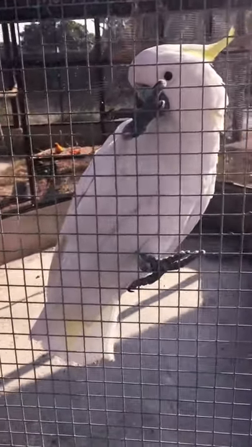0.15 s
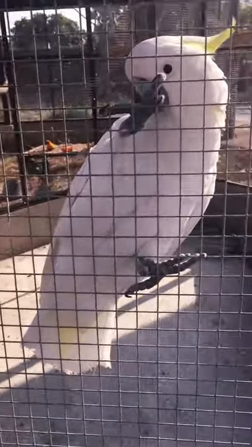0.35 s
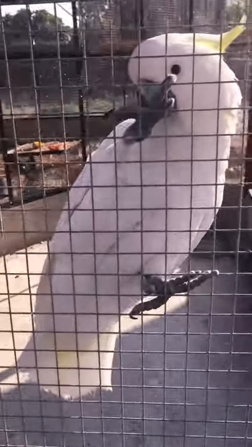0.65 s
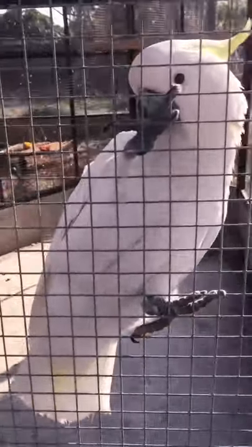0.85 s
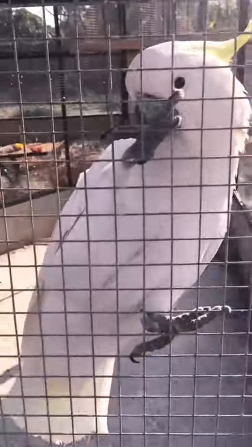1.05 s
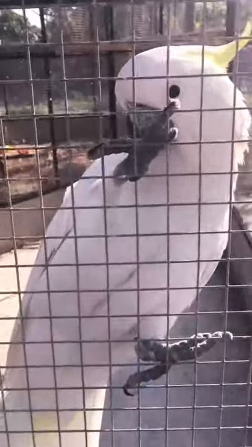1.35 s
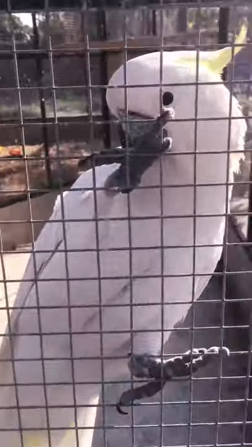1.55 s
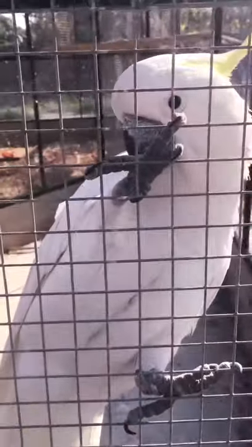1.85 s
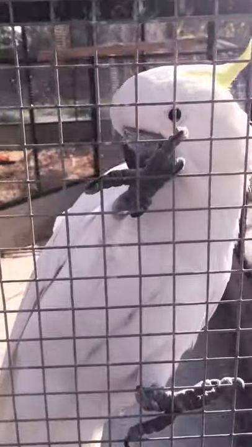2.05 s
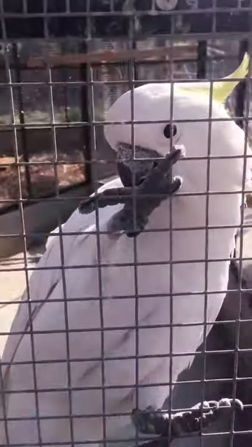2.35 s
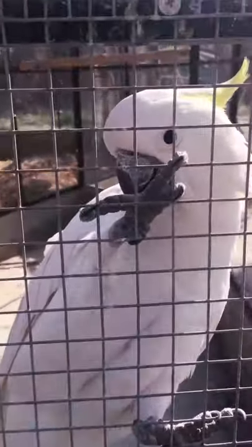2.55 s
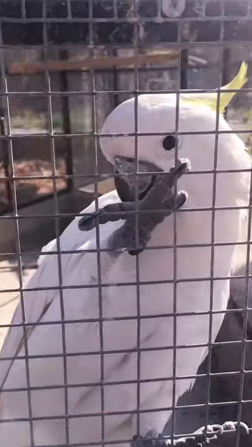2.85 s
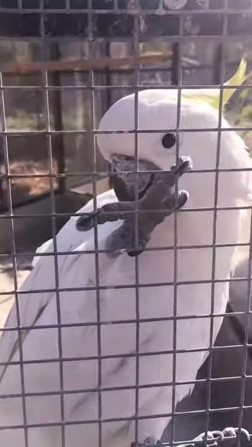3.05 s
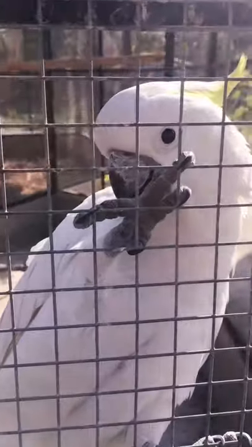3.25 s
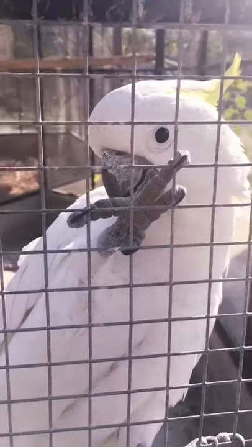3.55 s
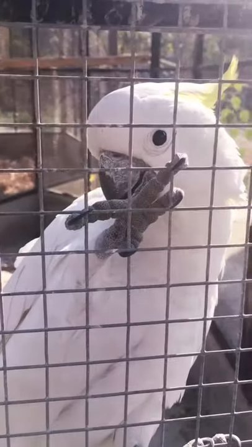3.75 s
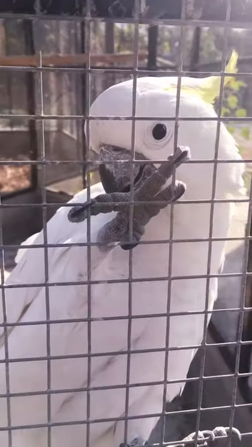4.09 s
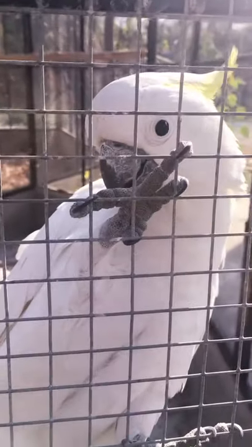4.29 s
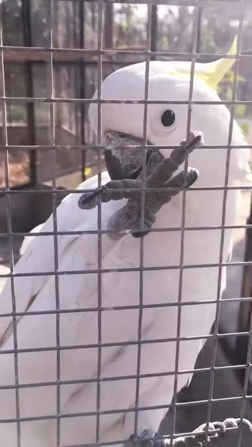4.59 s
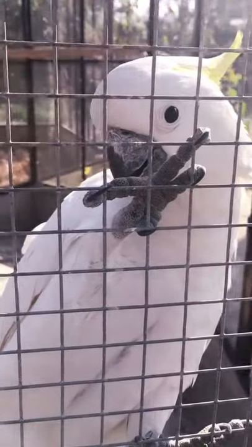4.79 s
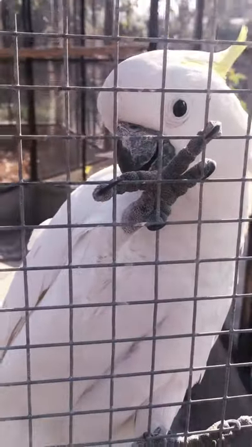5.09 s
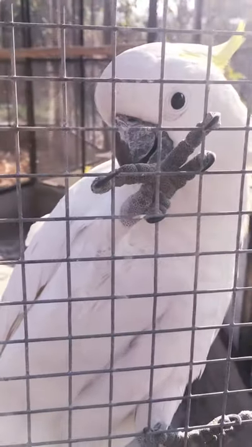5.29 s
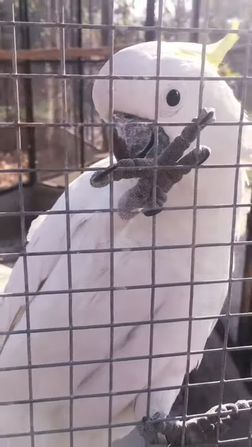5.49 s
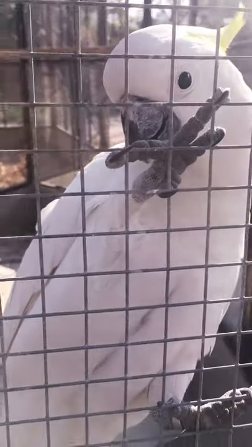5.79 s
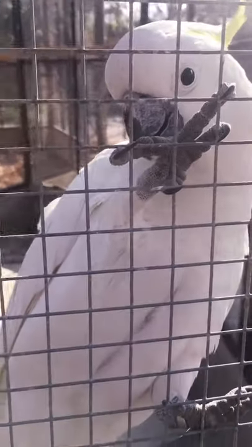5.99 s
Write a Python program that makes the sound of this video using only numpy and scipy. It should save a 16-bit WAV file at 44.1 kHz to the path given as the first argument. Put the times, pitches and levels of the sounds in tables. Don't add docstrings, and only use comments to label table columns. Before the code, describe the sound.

Bursts of loud raspy parrot squawks and falling whistles over faint engine hum, soft dove hoots and claw ticks, ending in a short croak.

```python
import sys
import numpy as np
from scipy import signal
from scipy.fft import rfft, irfft, next_fast_len
from scipy.io import wavfile
from scipy.ndimage import uniform_filter1d, map_coordinates

SR = 44100
rng = np.random.default_rng(int(sys.argv[2]) if len(sys.argv) > 2 else 0)


def linear_from_db(decibels):
    return 10 ** (np.asarray(decibels, float) / 20)


def to_wav(s):
    ch = np.atleast_2d(s).T
    pcm = np.round(np.clip(ch, -1, 1) * 32767)
    wavfile.write(sys.argv[1], SR, pcm.astype(np.int16))


N = 270333
T = np.arange(N) / SR


def unit(x):
    return x / np.sqrt(np.mean(x ** 2) + 1e-20)


def along(points, hz):
    f, v = np.transpose(points)
    return np.interp(np.log(hz + 1), np.log(f + 1), v)


def wobble(rate, size):
    knots = rng.standard_normal(int(size * rate / SR) + 4)
    return map_coordinates(knots, [np.arange(size) * rate / SR])


def filtered(x, response):
    m = next_fast_len(len(x) + 8192)
    return irfft(rfft(x, m) * response(np.fft.rfftfreq(m, 1 / SR)), m)[:len(x)]


# f/Hz, level/dB per Hz
AIR_COLOUR = [(59, -7.5), (100, -10), (129, -9.5), (500, -20), (944, -17), (3660, -24), (3990, -20.5),
              (4620, -27.5), (5840, -25), (7690, -37), (11500, -39), (15800, -41)]
# t/s, level/dB
AIR_LEVEL = [(0, -55.5), (.6, -57.5), (1.3, -58), (2.8, -56.5), (3.05, -52), (3.3, -55), (4.9, -55),
             (6.13, -55)]


def air():
    z = signal.stft(rng.standard_normal(N), nperseg=512)[2]
    patches = uniform_filter1d(rng.standard_normal(z.shape), 6, 0)
    patches = uniform_filter1d(patches, 14, 1)
    patchy = signal.istft(z * linear_from_db(1.8 * unit(patches)), nperseg=512)[1][:N]
    coloured = unit(filtered(patchy, lambda hz: linear_from_db(along(AIR_COLOUR, hz))))
    return linear_from_db(np.interp(T, *np.transpose(AIR_LEVEL))) * coloured


# t/s, throb level/dB, drone level/dB, whine level/dB
ENGINE_LEVELS = [
    (0.0, -61, -61, -61),
    (0.56, -60, -63, -61.5),
    (2.99, -61, -64.5, -70),
    (3.34, -61, -60, -92),
    (3.91, -59.5, -62, -85),
    (5.53, -61, -52.5, -104),
    (6.13, -58, -48.5, -67),
]


def engine():
    s, *levels = np.transpose(ENGINE_LEVELS)
    out = np.zeros(N)
    for hz, db, drift in zip((55, 73.5, 166), levels, (.07, .012, .008)):
        turn = 2 * np.pi * np.cumsum(hz * (1 + drift * wobble(12, size=N))) / SR
        out += linear_from_db(np.interp(T, s, db) + 2.2 * wobble(6.9, size=N)) * np.sqrt(2) * np.sin(turn)
    weak = sum(linear_from_db(3 * wobble(5, size=N)) * np.sin(turn * order / 3) for order in range(4, 7))
    return out + linear_from_db(np.interp(T, s, db) - 7.0) * weak


# t/s, length/s, f/Hz, level/dB
COOS = [
    (0, 0.24, 219.5, -58),
    (0.699, 0.16, 256, -55.5),
    (2.631, 0.16, 257, -58.5),
    (5.68, 0.27, 221, -60.5),
]


def coos():
    out = np.zeros(N)
    for s, length, hz, db in COOS:
        swell = np.sin(np.pi * np.clip((T - s) / length, 0, 1)) ** 0.17
        out += linear_from_db(db) * swell * np.sqrt(2) * np.sin(2 * np.pi * hz * T)
    return out


def notes(rows, shape):
    peak, rise_db, fall_db, bend = shape
    u = np.linspace(0, 1, 9)
    swell_db = np.interp(u, (0, np.clip(peak, .05, .95), 1), (-rise_db, 0, -fall_db))
    curves = []
    for s, length, db, first, last in rows:
        pitch_hz = last + (first - last) * (1 - u) ** bend
        curves.append(np.transpose([s + length * u, pitch_hz, db + swell_db]))
    return curves


def partials(turn, pitch_hz, share, gains, k):
    clock = np.cumsum(150 + 900 * share ** 2) / SR
    high = .5 + k * pitch_hz.mean() / 5000
    knots = rng.standard_normal((len(k), 2, int(4 * clock[-1]) + 2))
    slip = []
    for h, (re, im) in zip(high, knots):
        slip.append(np.interp(clock * h, np.arange(len(re)), re + 1j * im))
    firm = (1 - share) ** high
    step = np.sqrt(firm) + np.sqrt(.75 * (1 - firm)) * np.array(slip)
    stack = gains * step * np.exp(1j * (k * turn + .1 * k * k))
    return stack.real.sum(0) / np.sqrt((gains ** 2).sum(0) / 2)


def bird(calls, manner, rough, throats, flutter_db, breath_db, edge=0.011):
    out = np.zeros(N)
    for rows, (*odd, bright_db), (onset, settled, settle_s), throat in zip(
            calls, manner, rough, throats * len(calls)):
        s, *cols = np.transpose(rows)
        a, b = max(int(s[0] * SR), 0), min(int(s[-1] * SR), N)
        t = T[a:b]
        pitch_hz, level_db = [np.interp(t, s, c) for c in cols]
        odd_db = np.interp(t, s[[0, -1]], (odd[0], odd[-1]))

        tilt_db = bright_db + 0.2241 * (level_db - level_db.max())
        tilt_db = tilt_db - 2 * np.exp((s[0] - t) / 0.022)
        share = settled + (onset - settled) * np.exp((s[0] - t) / settle_s)

        def colour(hz, tilt):
            return linear_from_db(along(throat, hz) + tilt * np.log2(hz / 3000 + .01))

        tremble = 1 + .03 * share ** 2 * wobble(200, size=b - a) + .02 * share * wobble(35, size=b - a)
        turn = 2 * np.pi * np.cumsum(pitch_hz * tremble) / SR
        k = np.arange(1, 16000 // pitch_hz.min() + 1)[:, None]
        gains = colour(k * pitch_hz, tilt_db) * linear_from_db(np.minimum(odd_db, 6) * (k % 2))
        gains = gains * (k * pitch_hz < 16000)
        tone = partials(turn, pitch_hz, share, gains, k)

        puffs = rng.standard_normal(b - a) * (1 + np.cos(turn)) ** 2
        breath = unit(filtered(puffs, lambda hz: colour(hz, tilt_db.mean())))
        rasp = unit(filtered(puffs, lambda hz: colour(hz, tilt_db.mean() - 5)))
        air_noise = linear_from_db(breath_db) * (.075 * breath + share ** 3 * rasp)

        flutter = linear_from_db(flutter_db * (1 - .7 * share ** 2) * wobble(140, size=b - a))
        fade = np.clip(np.minimum(t - s[0], s[-1] - t) / edge, 0, 1)
        out[a:b] += linear_from_db(level_db) * fade * unit(flutter) * (tone + air_noise)
    return out



# t/s, length/s, peak level/dB, first f/Hz, last f/Hz
FAR = [
    (0, 0.17, -70.5, 668, 652),
    (.49, 0.098, -70.5, 938, 883),
    (.83, 0.051, -68, 880, 877),
    (3.49, 0.35, -67, 873, 904),
    (4.39, 0.16, -73, 3780, 3840),
    (4.83, 0.067, -66.5, 1080, 1000),
    (5.62, 0.087, -74.5, 1017, 947),
    (5.97, 0.15, -60.5, 1050, 1112),
    (3, 0.21, -69.5, 1424, 1423),
    (3.015, 0.064, -66, 2010, 1860),
]
LATE_SWELLS = [
    (.65, .165, -68, 776, 648),
    (5.695, 0.078, -68, 770, 950),
]
FAR_SHAPE = (0.11, 1, 7.9, 0.906)
LATE_SHAPE = (0.27, 30, 8.3, 1.3)
FAR_MANNER = [(8, -3.5), (-6, -17), (-2, -8), (-20, -23.5), (-3, -21), (-9, -5), (15, -4), (-7.5, -4.5),
              (6, -5.5), (6, -7)]
LATE_MANNER = [(1, -0.5), (-1.7, -14)]
FAR_ROUGH = [(r, r, 1) for r in (.45, .4, .4, .68, .35, .7, .45, .3, .45, .4, .25, .4)]
DISTANT_THROAT = [(400, 11), (700, -9.5), (4200, 2), (5600, -20), (8000, -23)]


def far_whistlers():
    calls = notes(FAR, FAR_SHAPE) + notes(LATE_SWELLS, LATE_SHAPE)
    return bird(calls, FAR_MANNER + LATE_MANNER, FAR_ROUGH, [DISTANT_THROAT],
                flutter_db=2, breath_db=-6, edge=.02)


# t/s, peak level/dB, wire f/Hz
CLAWS = [(.0276, -25, 6280), (0.0364, -32, 6500), (0.807, -55, 12000), (0.8106, -37.5, 6400),
         (1.041, -46, 13000), (2.7573, -42, 4020), (2.989, -54, 13500), (3.029, -46, 14200),
         (3.153, -78, 13000), (3.634, -45, 9000), (3.7349, -22.5, 3380), (3.739, -33, 3160),
         (3.7435, -54, 3140), (3.7549, -39, 6200), (3.767, -39, 13100), (3.779, -49, 6000),
         (3.817, -34, 11200), (3.8198, -35.5, 6700), (3.8267, -39, 5660), (3.842, -57, 4000),
         (3.876, -51, 3180), (4.4468, -53, 14000), (4.478, -68, 13000), (4.5013, -44.5, 9100),
         (4.507, -48, 7000), (4.522, -44, 6500), (4.553, -47, 12000), (4.566, -43, 11400),
         (4.570, -37, 12500), (4.577, -39, 7300), (4.592, -54, 5920), (4.618, -45, 11900),
         (4.623, -43, 9450), (4.635, -45, 6560), (4.654, -47, 8900), (4.659, -42, 8000),
         (4.668, -40.5, 9900), (4.673, -40, 7900), (4.696, -37, 7800), (4.701, -37, 7900),
         (4.733, -40, 13100), (4.753, -42, 12000), (4.757, -38, 9000), (4.782, -45, 13000),
         (4.785, -41, 9050), (5.757, -41, 4800), (5.968, -31, 3220), (5.974, -31, 2600)]
# t/s, peak level/dB
KNOCKS = [
    (0.0273, -26),
    (0.036, -24.5),
    (3.737, -46),
    (3.818, -36),
    (4.522, -36),
    (4.572, -37),
    (5.967, -40),
]


def claws():
    bright, dull = np.zeros(N + SR), np.zeros(N + SR)
    t = np.arange(SR // 20) / SR
    for s, db, hz in CLAWS:
        crack = rng.standard_normal(len(t)) * (linear_from_db(-60 * t / .0045) + linear_from_db(-17 - 60 * t / .06))
        ring = linear_from_db(2 - 60 * t / .006) * np.sin(2 * np.pi * hz * t)
        bright[round(s * SR):][:len(t)] += linear_from_db(db) * (crack + ring)
    for s, db in KNOCKS:
        dull[round(s * SR):][:len(t)] += linear_from_db(db - 60 * t / 0.023) * rng.standard_normal(len(t))
    wire = filtered(bright[:N], lambda f: (1j * f / (2600 + 1j * f)) ** 2 / (1 + 1j * f / 14000))
    frame = filtered(dull[:N], lambda f: 1j * f / (250 + 1j * f) / (1 + 1j * f / 2200) ** 2)
    return wire + frame


# t/s, f/Hz, level/dB
SHRILL = [
    [(.268, 1184, -47), (.3, 1124, -40.5), (.39, 1130, -41)],
    [(.378, 1206, -30.5), (.44, 1195, -42), (.48, 1240, -67)],
    [(3.42, 1190, -46), (3.47, 1271, -33.5), (3.51, 1382, -33.5), (3.57, 1338, -41)],
    [(4.72, 785, -47), (4.75, 862, -47), (4.79, 1054, -55.5), (4.91, 1042, -53)],
    [(5.025, 1265, -34.5), (5.07, 1249, -38.5), (5.11, 1273, -35.5), (5.16, 1300, -34), (5.19, 1305, -46),
     (5.22, 1310, -59)],
    [(.275, 1570, -48), (.33, 1570, -50), (.39, 1620, -53)],
    [(.265, 1180, -47), (.302, 1316, -41)],
]
SHRILL_MANNER = [(-30, -1.5), (-6, 3.5), (-5, 1.5), (-18, -5.5), (-2.5, 1.7), (-22, -4), (-25, -9)]
SHRILL_ROUGH = [(.65, .5, .05), (.75, .58, .05), (.7, .85, .08), (.8, .75, .1), (.82, .72, .1),
                (.6, .6, .1), (.45, .45, .1)]
PIPING_THROAT = [(1200, -47), (2300, -20), (3400, -2), (4500, 4), (6700, -12), (9000, -2.5), (10500, -28),
                 (16000, -34)]
SMALL_THROAT = [(1200, -45), (2000, -49), (2500, 9.5), (3600, 5), (4800, 0.5), (7000, -5), (9200, -5),
                (10500, -12), (16000, -34)]
THIN_THROAT = [(1200, -41), (2150, -33), (2500, 2.5), (3800, 0.5), (5300, 6.5), (6500, -12), (8200, -11.5),
               (9500, -5.5), (12000, -22), (16000, -31)]


def parakeets():
    throats = [PIPING_THROAT, SMALL_THROAT, THIN_THROAT, SMALL_THROAT, THIN_THROAT, SMALL_THROAT, SMALL_THROAT]
    return bird(SHRILL, SHRILL_MANNER, SHRILL_ROUGH, throats, flutter_db=3.5, breath_db=-1.5, edge=.02)


# t/s, f/Hz, level/dB
SCREECH = [
    [(.91, 1050, -48), (.935, 1042, -42), (.96, 1061, -42), (1.02, 1016, -41.5), (1.045, 936, -34)],
    [(1.005, 871, -44), (1.05, 874, -41), (1.07, 925, -37), (1.095, 928, -39), (1.12, 952.4, -34.5),
     (1.15, 933, -42)],
    [(1.38, 816, -43), (1.41, 873, -28), (1.45, 920, -26), (1.49, 1003, -25), (1.53, 956, -24),
     (1.58, 1023, -27.5), (1.615, 1011, -31.5), (1.645, 949, -29), (1.672, 910, -29)],
    [(1.9, 813, -38), (1.924, 850, -26), (1.945, 905, -16), (1.98, 933, -19), (2.02, 945.4, -16.5),
     (2.07, 941.7, -20.5), (2.11, 938, -19), (2.15, 855, -26)],
    [(2.355, 1004, -31), (2.39, 1043, -24.5), (2.42, 1095, -19.5), (2.46, 1058, -15), (2.52, 1020, -17.5),
     (2.58, 1013, -19), (2.63, 979, -24.5), (2.67, 944, -34)],
    [(5.785, 905.6, -42.5), (5.82, 997, -26), (5.87, 1029, -26.5), (5.91, 1031, -24.5),
     (5.932, 1016, -20.5), (5.948, 992, -21), (5.964, 926, -20.5), (5.985, 910, -45)],
]
SCREECH_MANNER = [(11, -4, -2), (-23, -25, -9), (3.5, -20, -1.5), (-8.5, 6, -2.5), (-1.5, -1, 0),
                  (19, -37, -1.5)]
SCREECH_ROUGH = [(.85, .82, .1), (.85, .55, .05), (.92, .3, .1), (.97, .27, .02), (.88, .38, .05),
                 (.99, .52, .09)]
RASP_THROAT = [(600, -61), (1050, -12.5), (2000, 0), (3000, -0.5), (4200, 0.5), (6500, -2.5), (9300, -3),
               (10500, -20), (16000, -24)]
BIG_THROAT = [(500, -106), (950, -40), (1350, -22), (1900, -7), (2700, -8), (3700, 0), (4300, 10),
              (5000, 5), (6100, -1), (7600, -8), (10500, -22), (16000, -31)]
GRUFF_THROAT = [(500, -88), (950, -47), (1350, -13), (1950, -7), (2900, -0.5), (3900, -0.5), (4700, -8.5),
                (5800, -3), (6800, -7.5), (7900, -2), (10500, -13), (16000, -31)]
CLEAR_THROAT = [(500, -106), (950, -45), (1350, -19), (1900, -8.5), (2800, -8), (3750, 3.5), (4300, -2.5),
                (5000, -12), (5700, 1), (6500, -3.5), (7600, -6.5), (10500, -19.5), (16000, -28)]
ARCH_THROAT = [(500, -106), (1000, -30.5), (1400, -17), (2100, -5), (3100, -9.5), (4250, 5), (5100, -9),
               (6200, -0.5), (7200, -9), (8200, -7), (10500, -18.5), (16000, -29)]
LATE_THROAT = [(500, -68), (950, -19), (1500, -21), (2100, -9), (3000, -0.5), (4100, -1.5), (5000, -6),
               (6000, -3.5), (7000, -5.5), (8000, -3.5), (10500, -14), (16000, -31)]


def cockatoo_screeches():
    throats = [RASP_THROAT, BIG_THROAT, GRUFF_THROAT, CLEAR_THROAT, ARCH_THROAT, LATE_THROAT]
    return bird(SCREECH, SCREECH_MANNER, SCREECH_ROUGH, throats, flutter_db=2.4, breath_db=-3.5, edge=.011)


# t/s, f/Hz, level/dB
GARGLE = [
    [(2.357, 1404, -34), (2.39, 1413, -28), (2.42, 1444, -36), (2.52, 1435, -38)],
    [(1.895, 1148, -41), (1.935, 1236, -37.5)],
    [(5.79, 1401, -45), (5.85, 1428, -31), (5.9, 1504, -40)],
    [(1.385, 1146, -40), (1.44, 1337, -38.5), (1.57, 1480, -39)],
]
GARGLE_MANNER = [(-1, 0.5), (-10, -4.5), (-0.5, -4.5), (1, -5.5)]
GARGLE_ROUGH = [(.55, .6, .05), (.9, .9, .1), (.75, .65, .1), (.8, .8, .1)]
GARGLE_THROAT = [(600, -49), (1200, -11), (2800, -0.5), (4200, -5), (5500, 4), (9000, -25), (16000, -34)]


def cockatoo_gargle():
    return bird(GARGLE, GARGLE_MANNER, GARGLE_ROUGH, [GARGLE_THROAT], flutter_db=3, breath_db=-3.5)


# t/s, f/Hz, level/dB
ANSWER = [
    [(1.525, 865, -27), (1.541, 856, -26), (1.552, 733, -25), (1.57, 812, -38), (1.595, 818, -27),
     (1.62, 857, -35), (1.665, 910, -32)],
    [(1.658, 795, -38), (1.668, 799, -28), (1.684, 772, -40)],
    [(2.085, 1130, -36), (2.13, 1119, -19.5), (2.17, 1116, -18.5), (2.21, 1070, -17), (2.25, 1031, -20),
     (2.29, 1018, -29)],
]
ANSWER_MANNER = [(-25, -34, -4.5), (-30, -34, 1.5), (-42, 5, 1.5)]
ANSWER_ROUGH = [(.4, .45, .05), (.2, .2, .02), (.72, .45, .05)]
ANSWER_THROAT = [(500, -106), (1050, -28), (1600, -22), (2200, -8.5), (3200, -4.5), (4500, 0), (6400, -7.5),
                 (10000, -18.5), (16000, -36)]
HOOK_THROAT = [(800, -60), (1570, -7.5), (3170, -0.5), (4750, -1), (6300, -17), (9500, -10), (16000, -32)]


def cockatoo_answers():
    return bird(ANSWER, ANSWER_MANNER, ANSWER_ROUGH, [ANSWER_THROAT, HOOK_THROAT, ANSWER_THROAT],
                flutter_db=3.2, breath_db=-3.5, edge=.008)


# t/s, length/s, peak level/dB, first f/Hz, last f/Hz
SWOOP = [
    (2.775, 0.061, -26.5, 3350, 2390),
]
DROOP = [
    (4.125, .11, -36, 1206, 860),
]
# t/s, f/Hz, level/dB
DIVE = [
    [(4.885, 1685, -54), (4.92, 1321, -46.5), (4.96, 1210, -46.5), (5.015, 1030, -43.5)],
    [(2.82, 2405, -33), (2.839, 2046, -30.5), (2.853, 1790, -33.5), (2.89, 1603, -36.5), (2.93, 1302, -42),
     (2.95, 1260, -51), (2.99, 1202, -43)],
    [(2.748, 1980, -41), (2.758, 2480, -36), (2.784, 2610, -41)],
    [(3.222, 805, -38), (3.245, 1150, -49), (3.285, 1330, -51)],
    [(5.232, 718, -53), (5.262, 1070, -48), (5.3, 1240, -50)],
]
SWOOP_SHAPE = (0.58, 6.3, 10, 1.3)
DROOP_SHAPE = (0.47, 7.4, 9.5, 0.82)
SWOOP_MANNER = [(4.2, -5.5)]
DIVE_MANNER = [(-6.5, -3.4), (0.82, -13.5, -1), (5.7, -4), (5, -20), (5, -25)]
DROOP_MANNER = [(-1, -6.5)]
GLIDE_ROUGH = [(.22, .3, .1), (.4, .55, .06), (.22, .33, .1), (.25, .25, .1), (.2, .3, .03), (.2, .3, .03),
               (.38, .42, .1)]
GLIDE_THROAT = [(400, -28), (700, -18), (2000, 3), (4000, 0.5), (6500, -8), (9000, -13), (16000, -55)]


def swooping_whistles():
    calls = notes(SWOOP, SWOOP_SHAPE) + DIVE + notes(DROOP, DROOP_SHAPE)
    manner = SWOOP_MANNER + DIVE_MANNER + DROOP_MANNER
    return bird(calls, manner, GLIDE_ROUGH, [GLIDE_THROAT], flutter_db=1.5, breath_db=-6)


# t/s, f/Hz, level/dB
HOARSE = [
    [(3.225, 574, -33), (3.249, 611.7, -34.5), (3.27, 639.6, -28.5), (3.3, 656, -26), (3.335, 661, -25),
     (3.37, 646, -26), (3.41, 644, -40)],
    [(3.92, 419, -46), (3.95, 459, -40.5), (3.995, 526, -26.5)],
    [(3.99, 674, -32.5), (4.105, 722.5, -28.5), (4.135, 699, -29)],
    [(5.238, 584.4, -37), (5.271, 610, -31), (5.315, 639.3, -23.5), (5.335, 693, -24), (5.37, 703, -22.5),
     (5.419, 687, -30.5), (5.44, 675, -56)],
]
HOARSE_MANNER = [(-0.5, -0.5, 0.5), (-5, 2, -2.5), (-3, 1.5, -3), (8.5, -6.5, 1)]
HOARSE_ROUGH = [(.4, .75, .14), (.36, .4, .1), (.18, .95, .14), (.55, .6, .075)]
HUSKY_THROAT = [(350, -64), (650, -15), (1300, -11.5), (2100, -4.5), (2800, -1), (3800, 4), (4600, -4.5),
                (5600, -1), (8500, -7.5), (11000, -26), (13500, -22), (16000, -28)]
REEDY_THROAT = [(350, -41), (650, -20), (1400, -6.5), (2100, -5.5), (2900, 3), (4500, -4.5), (6200, 2),
                (8300, -10), (10000, -19.5), (12200, -25), (13500, -9), (16000, -30)]
LOW_THROAT = [(350, -53), (650, -18), (1300, -10.5), (2100, -5), (3300, 4), (4500, -7.5), (5500, -3),
              (8500, -10), (11500, -28), (13500, -26), (16000, -30)]


def hoarse_bird():
    return bird(HOARSE, HOARSE_MANNER, HOARSE_ROUGH, [HUSKY_THROAT, REEDY_THROAT, REEDY_THROAT, LOW_THROAT],
                flutter_db=1.5, breath_db=-1, edge=.02)


# t/s, length/s, pulse level/dB
CROAK = [
    (6.0873, .007, -15),
    (6.1097, .018, -14.5),
]
# f/Hz, width f/Hz, level/dB
CROAK_THROAT = [(257, 66, -20), (1250, 85, 1), (1750, 110, -8), (2200, 120, -22), (2900, 200, -23),
                (3700, 500, -30), (4600, 500, -31)]


def croak():
    period_s = .00482
    pulses = np.zeros(N + SR)
    for s, length, db in CROAK:
        times = s + np.arange(-period_s, length, period_s)
        times = times + rng.normal(0, .00004, len(times))
        pulse_db = db + 37.5 + rng.normal(0, 1.8, len(times))
        pulse_db = pulse_db - 21 * (times < s - period_s / 2)
        pulses[np.round(times * SR).astype(int)] = linear_from_db(pulse_db)

    def response(f):
        throat = 0
        for k, (centre, width, db) in enumerate(CROAK_THROAT):
            peak = 1j * f * width / (centre ** 2 - f * f + 1j * f * width)
            throat = throat + (-1) ** k * linear_from_db(db) * peak
        wall = 1 + linear_from_db(-6) * np.exp(-2j * np.pi * f * .0032) / (1 + (f / 2200) ** 4)
        softening = (1 + 1.2j * f / 5000 - (f / 5000) ** 2) ** 2
        return throat * wall / softening

    return filtered(pulses[:N], response)


# f/Hz, t60/s
YARD = [(500, 0.3), (2000, 0.38), (5000, 0.34), (10000, 0.27), (16000, 0.03)]


def yard(x, chunk=0.23):
    out, step = np.zeros(N + SR * 2), int(chunk * SR)
    for a in range(0, N, step):
        hz, t, z = signal.stft(rng.standard_normal(SR), SR, nperseg=256)
        decay = linear_from_db(-60 * t / along(YARD, hz)[:, None])
        tail = signal.istft(z * decay, SR, nperseg=256)[1]
        wet = signal.fftconvolve(x[a:a + step], tail / np.linalg.norm(tail))
        out[a:a + len(wet)] += wet
    return out[:N]


def scene():
    far = far_whistlers()
    mesh = claws()
    small = parakeets() + swooping_whistles()
    near = cockatoo_screeches() + cockatoo_gargle() + cockatoo_answers() + hoarse_bird()
    direct = linear_from_db(-3.0) * near + linear_from_db(-2.0) * small + linear_from_db(16.5) * far + mesh
    wet = linear_from_db(-9.5) * near + linear_from_db(-7.5) * small + linear_from_db(10.0) * far + linear_from_db(-8.0) * mesh
    background = air() + engine() + coos()
    return (direct + yard(wet) + croak() + background)[None]


def band_limit(x):
    return signal.sosfilt(signal.butter(12, 16520, fs=SR, output="sos"), x)


def record(dry):
    heard = filtered(dry[0], lambda hz: (hz < 15900) / (1 + (36 / (hz + 1)) ** 6))[None]
    return band_limit(heard)


dry = scene()
out = record(dry)
to_wav(out)
```